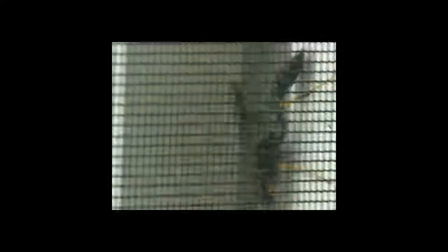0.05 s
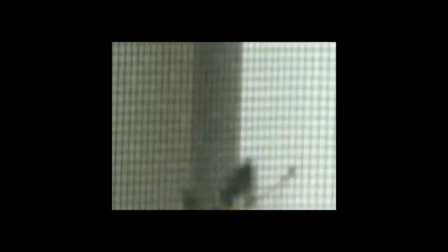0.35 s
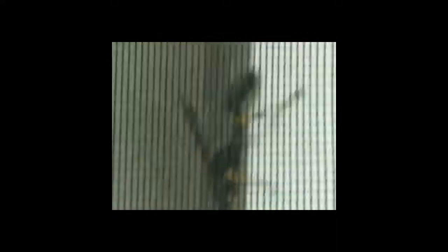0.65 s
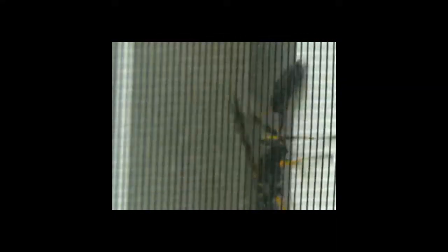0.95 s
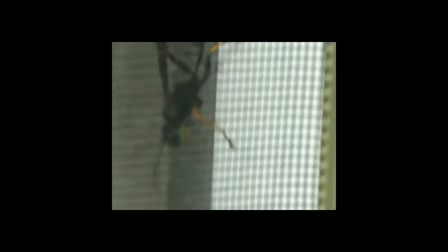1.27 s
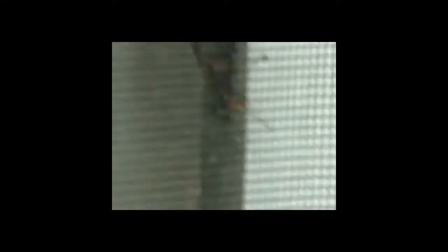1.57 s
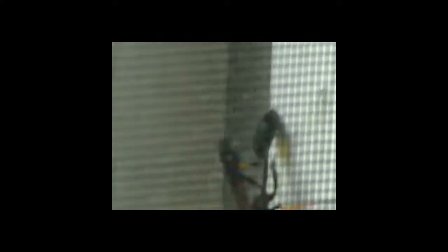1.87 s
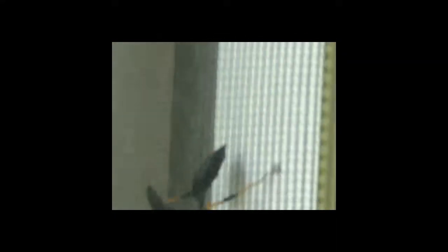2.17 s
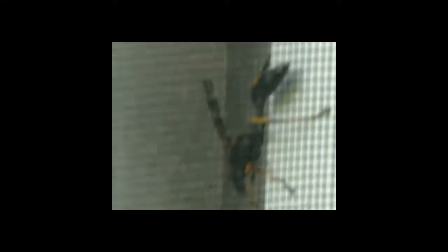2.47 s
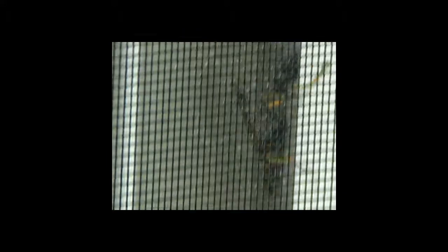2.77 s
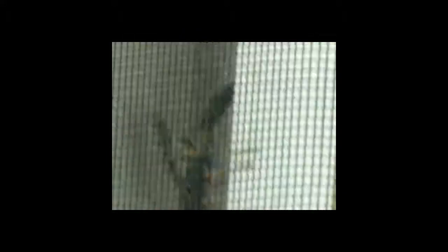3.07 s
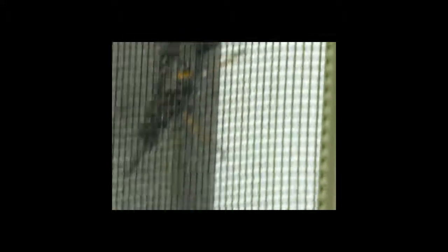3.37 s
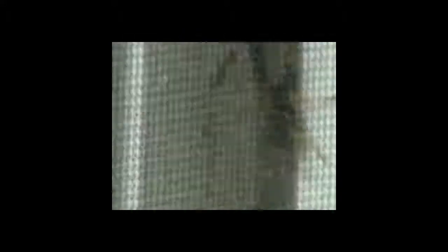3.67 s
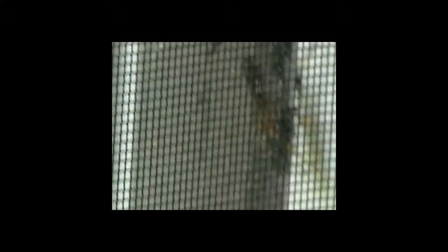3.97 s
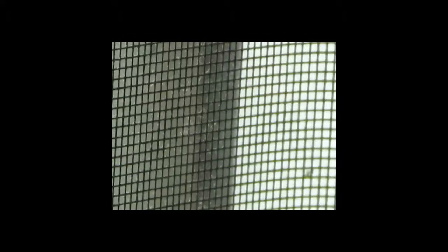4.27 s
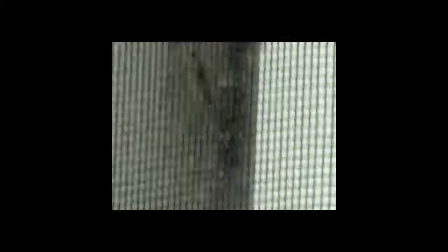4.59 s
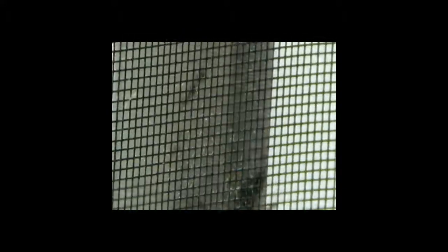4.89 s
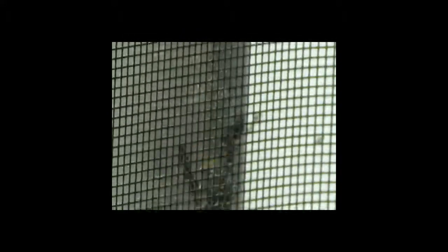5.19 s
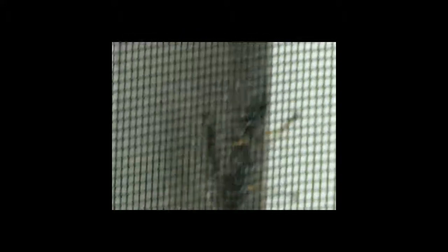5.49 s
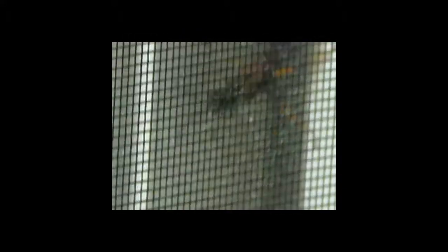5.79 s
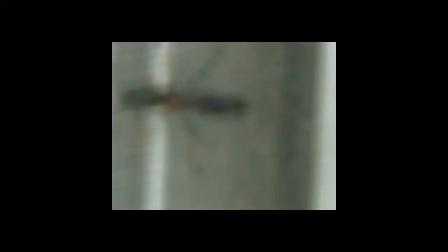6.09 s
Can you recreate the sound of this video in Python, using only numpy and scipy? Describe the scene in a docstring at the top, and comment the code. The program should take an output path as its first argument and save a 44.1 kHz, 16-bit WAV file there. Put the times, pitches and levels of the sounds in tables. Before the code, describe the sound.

A wasp's feet tap a window screen twice, tiny high ticks a couple of seconds apart. Three much louder clicks follow, like a camera button near the microphone, a quick pair and then a single one, each a bright snap merged with a duller knock. The wasp ticks once more at the end. The room is quiet and slightly echoing, with a soft rush of air and a faraway machine humming throughout.

```python
"""From the start, air rushes softly and a distant machine hums in a quiet room. A wasp's footfalls make
faint ticks on a window screen at 0.6 and 3.0 s. Three sharp clicks, likely a camera button, follow at
3.6, 3.9 and 5.5 s: each is a bright snap, then a duller knock as the button lands.
The wasp makes a last tick at 6.2 s. Every tick and click leaves a short echo off the walls."""
import sys
import numpy as np
from scipy import signal
from scipy.fft import rfft, irfft
from scipy.io import wavfile

SR = 44100
rng = np.random.default_rng(int(sys.argv[2]) if len(sys.argv) > 2 else 0)


def unload_wav(signal):
    """Save mono or channel-first audio to the path in sys.argv[1] as 16-bit WAV at rate SR, clipped to [-1, 1]."""
    wavfile.write(
        sys.argv[1],
        SR,
        np.round(np.clip(np.atleast_2d(signal).T, -1, 1) * 32767).astype(np.int16),
    )


N = 279594
TIME = np.arange(N) / SR
FREQS = np.fft.rfftfreq(N, 1 / SR)

# How strong the air's rush is, from low rumble to high hiss: pitch_hz, relative_db
AIR_COLOUR = [(20, -4.5), (75, -6.5), (140, 1), (250, -2), (400, -4.5), (800, -3.5), (1200, -6),
              (1600, -8.5), (2600, -14.5), (4300, -19), (6500, -26), (10000, -29.5), (12500, -29),
              (16000, -32.5)]
# The machine's low tones: name, pitch_hz, wander_hz, level_db
MACHINE_TONES = [("drone", 43.2, 0.63, -51.5), ("motor", 49.0, 1.2, -60), ("hum", 98.0, .8, -57.5),
                 ("overtone", 245.5, 1.0, -61.5)]
# Moments when one tone grows louder and sinks back: name, peak_time_s, half_length_s, rise_db
TONE_SWELLS = [("hum", 0.81, .55, 9), ("hum", 2.01, .14, 7.5), ("hum", 4.48, .35, 6),
               ("overtone", 0.28, 0.33, 6), ("overtone", 4.64, .33, 11.5), ("drone", 5.65, 1, 4.5)]
# The machine's faint, fuzzy whines: pitch_hz, half_width_hz, level_db
MACHINE_WHINES = [(39.8, 2.3, -62), (146.3, 2.8, -63.5), (163, 7, -62), (228, 5, -60), (298, 8.4, -62),
                  (320.3, 7.6, -63.5), (511, 6.5, -65.5), (639, 8.7, -62.5), (811, 12, -62),
                  (923, 8.6, -62.5), (1218, 53, -59), (3490, 120, -75), (6260, 50, -83)]
# The wasp's steps; more tilt is brighter: start_s, level_db, pitch_factor, tilt_db_per_octave
FOOTFALLS = [(0.6433, -28, 1.02, -1), (2.9818, -32, 1.07, -1.5), (6.2280, -31, 1, 2)]
# The screen's tones; ring is the time to fade by 60 dB: base_pitch_hz, relative_db, base_ring_s
SCREEN_TONES = [(1570, 0, .016), (3100, -4, .007), (5000, -5, .008), (6090, -6, .008), (8100, -8, .006),
                (9600, -5, .008)]
# The fizz of surfaces chattering as they touch: pitch_hz, relative_db
FIZZ_COLOUR = [(600, -25), (1200, -22), (2500, -4), (4500, -0.5), (7000, -6.5), (9000, -0.5), (11300, -5),
               (13500, -3), (16000, -3)]
# How strong the room's echo is, from low to high: pitch_hz, relative_db
ECHO_COLOUR = [(700, -11), (1300, 3), (2600, 7), (4500, -3), (7000, -9), (9000, -8), (12000, -0.5),
               (14000, -5), (16000, -9)]
# The button snapping free: start_s, level_db, pitch_factor, tilt_db_per_octave
SNAP_HITS = [(3.6466, -8.5, 0.98, -2.5), (3.9393, -6.5, 0.98, -1.5), (5.4570, -7, 1.0, -0.7)]
# The tones in a snap: base_pitch_hz, relative_db, base_ring_s
SNAP_TONES = [(2230, 0, 0.0029), (3600, -5, 0.0055), (5800, -10.5, 0.0027), (8000, -11, 0.0054),
              (10630, -4.5, 0.0062), (11600, -3, 0.0077), (12500, -18, 0.013), (14100, -15, .005),
              (15100, -14, .006)]
# The button landing, twice per click: start_s, level_db, pitch_factor, ring_factor, tilt_db_per_octave
KNOCK_HITS = [(3.6484, -16, 1.12, .7, 8), (3.6487, -6, 1.042, 1.5, 1), (3.9423, -9, 0.94, 0.32, -2),
              (3.9439, -8, 0.98, 1.16, -3.5), (5.4601, -12, 1.486, 0.79, -5),
              (5.4611, -11.5, 0.746, 1.1, -3)]
# The tones in a knock: base_pitch_hz, relative_db, base_ring_s
KNOCK_TONES = [(1160, -13, 0.0071), (1490, -3.5, 0.0083), (1977, 1, 0.0063), (2374, -1, 0.0094),
               (3230, -10.5, 0.0087), (3670, -6, 0.0056), (5900, -23, 0.0024), (8040, -13, .003),
               (11200, -8.5, 0.005)]


def gain_of(db):
    """Turns decibels into a number to multiply a sound by."""
    return 10 ** (np.asarray(db) / 20)


def unit_level(sound):
    """Scales a sound so that its average level (rms) is 1."""
    return sound / np.sqrt(np.mean(sound ** 2) + 1e-20)


def noise(gains, size=N):
    """Noise of level 1, with one gain for each frequency."""
    return unit_level(irfft(rfft(rng.standard_normal(size)) * gains, size))


def coloured_noise(colour, size=N):
    """Noise of level 1 whose lows and highs follow a colour table."""
    table_hz, table_db = np.transpose(colour)
    hz = np.fft.rfftfreq(size, 1 / SR)
    curve_db = np.interp(np.log(hz + 1), np.log(table_hz), table_db)
    return noise(gain_of(curve_db), size)


def room_air(level_db=-43):
    """The air in the room makes a smooth, steady rush."""
    return gain_of(level_db) * coloured_noise(AIR_COLOUR)


def drift(rate_hz):
    """A slow, random wobble of level 1, up to about the given rate."""
    return noise(np.exp(-(FREQS / rate_hz) ** 2))


def machine_hum(wander_rate_hz=3.15, waver_rate_hz=4, waver_db=1.6):
    """A distant machine's low tones wander in pitch, waver and swell, along with faint whines."""
    out = np.zeros(N)
    for name, hz, wander_hz, db in MACHINE_TONES:
        pitch_hz = hz + wander_hz * drift(wander_rate_hz)
        swell_db = sum(rise_db * np.exp(-((TIME - peak_s) / half_s) ** 2)
                       for tone, peak_s, half_s, rise_db in TONE_SWELLS if tone == name)
        level_db = db + swell_db + waver_db * drift(waver_rate_hz)
        phase = 2 * np.pi * np.cumsum(pitch_hz) / SR
        out += gain_of(level_db) * unit_level(np.sin(phase))
    for hz, half_width_hz, db in MACHINE_WHINES:
        narrow_band = 1 / (1 + ((FREQS - hz) / half_width_hz) ** 2)
        out += gain_of(db) * noise(narrow_band)
    return out


def strike(tones, pitch, ring, tilt_db, rise_s, fizz_db, fizz_s):
    """A struck part rings and fizzes, then fades. Pitch and ring multiply the table's values."""
    t = np.arange(2048) / SR
    lowest_hz = tones[0][0]
    ringing = np.zeros(len(t))
    for k, (hz, db, ring_s) in enumerate(tones):
        start_db = db + tilt_db * np.log2(hz / lowest_hz)
        fade = gain_of(start_db - 60 * t / (ring_s * ring))
        ringing += (-1) ** k * fade * np.sin(2 * np.pi * hz * pitch * t)  # every other tone is flipped
    attack = 1 - np.exp(-(t / rise_s) ** 2)
    ringing *= attack
    peak = abs(signal.hilbert(ringing)).max()
    fizz = coloured_noise(FIZZ_COLOUR, len(t)) * attack * gain_of(fizz_db - 60 * t / fizz_s)
    return ringing / peak + fizz


def add(mix, start_s, sound):
    """Adds a sound to the mix at the given time."""
    part = mix[round(start_s * SR):][:len(sound)]
    part += sound[:len(part)]


def wasp_footfalls():
    """A wasp's feet tap the window screen, and the mesh rings with a faint tick."""
    out = np.zeros(N)
    for start_s, db, pitch, tilt_db in FOOTFALLS:
        tick = strike(SCREEN_TONES, pitch, ring=0.96, tilt_db=tilt_db,
                      rise_s=0.0005, fizz_db=-12, fizz_s=0.012)
        add(out, start_s, gain_of(db) * tick)
    return out


def room_echo(sound, fade_s=0.14, level_db=-18, build_s=0.0026):
    """The energy of each tick and click scatters off the walls into a short, airy tail."""
    t = TIME[:SR // 2]
    tail = gain_of(-60 * t / fade_s) ** 2 * (1 - np.exp(-t / build_s))
    energy = abs(signal.fftconvolve(sound ** 2, tail / tail.sum())[:N])
    return gain_of(level_db) * np.sqrt(energy) * coloured_noise(ECHO_COLOUR)


def button_clicks():
    """A button lets go with a bright snap and lands with a duller knock a few milliseconds later."""
    out = np.zeros(N)
    for start_s, db, pitch, tilt_db in SNAP_HITS:
        snap = strike(SNAP_TONES, pitch, ring=0.9, tilt_db=tilt_db,
                      rise_s=0.00061, fizz_db=-11.5, fizz_s=0.011)
        add(out, start_s, gain_of(db) * snap)
    for start_s, db, pitch, ring, tilt_db in KNOCK_HITS:
        knock = strike(KNOCK_TONES, pitch, ring, tilt_db, rise_s=0.00014, fizz_db=-17, fizz_s=0.019)
        add(out, start_s, gain_of(db) * knock)
    return out


def scene(low_cut_hz=980):
    """Mixes clicks, footfalls, echo, air and hum, the same on the left and the right."""
    cut_bass = signal.butter(6, low_cut_hz, "highpass", fs=SR, output="sos")
    hits = signal.sosfilt(cut_bass, button_clicks() + wasp_footfalls())  # small parts give off no bass
    mono = hits + room_echo(hits) + room_air() + machine_hum()
    return np.array([mono, mono])


def record(dry, high_cut_hz=16100):
    """Takes away the very highest treble."""
    cut_treble = signal.firwin(511, high_cut_hz, window=("kaiser", 9), fs=SR)
    return signal.oaconvolve(dry, cut_treble[None], "same")


dry = scene()
out = record(dry)
unload_wav(out)
```